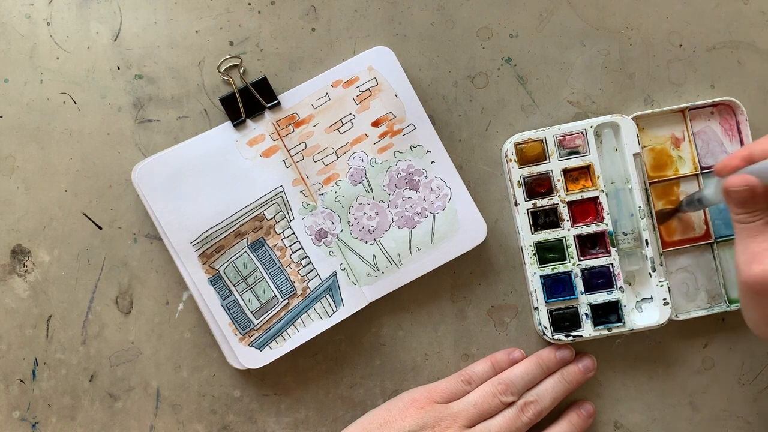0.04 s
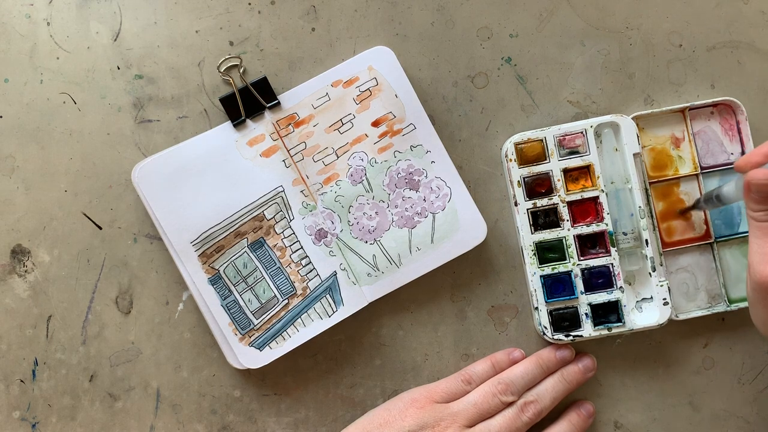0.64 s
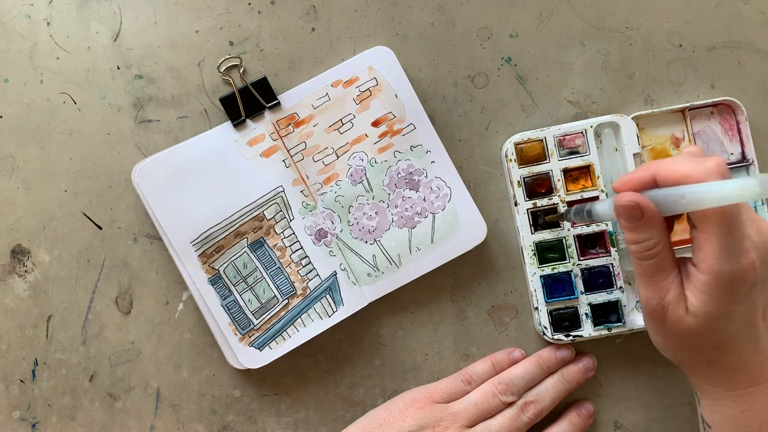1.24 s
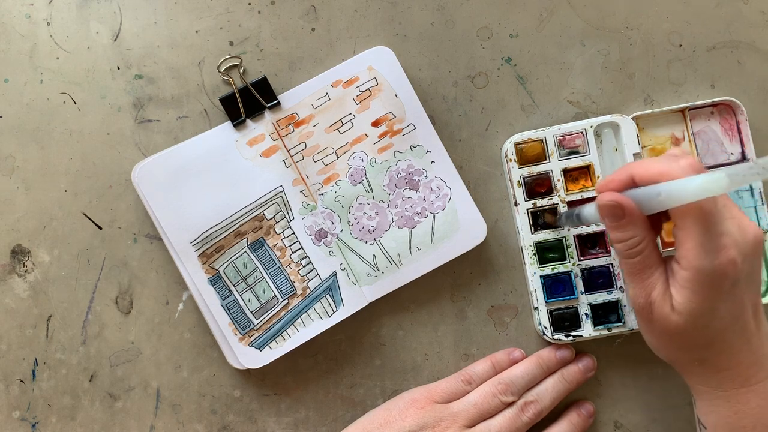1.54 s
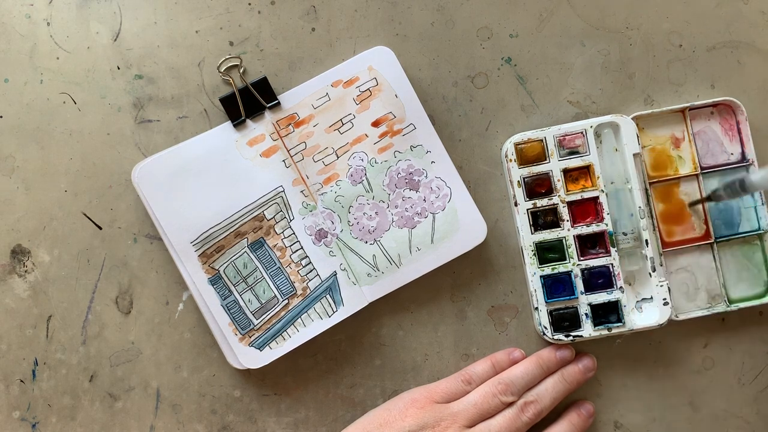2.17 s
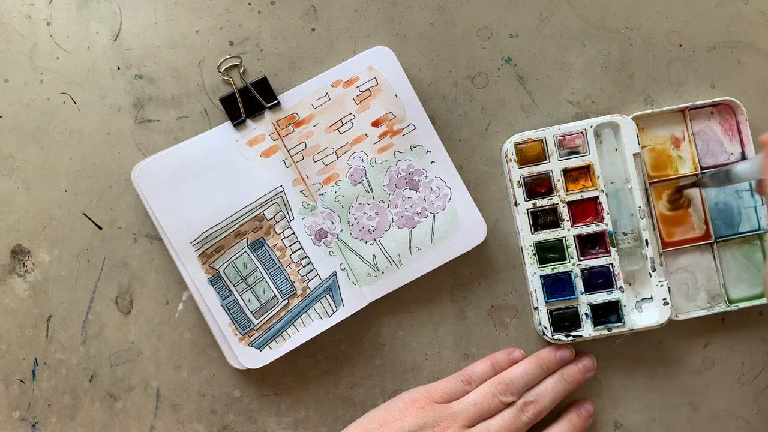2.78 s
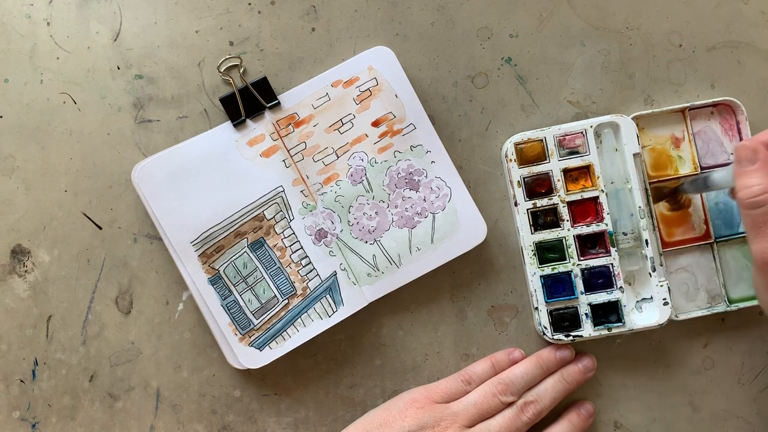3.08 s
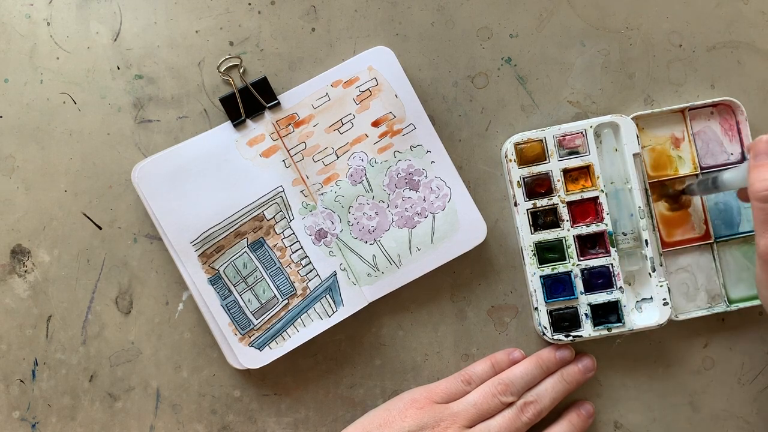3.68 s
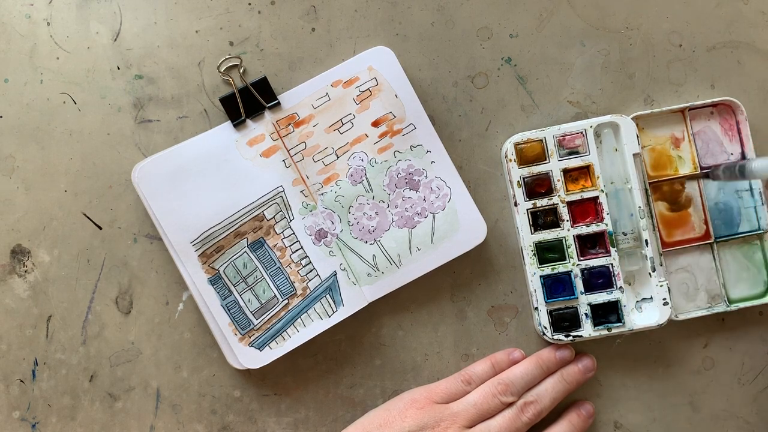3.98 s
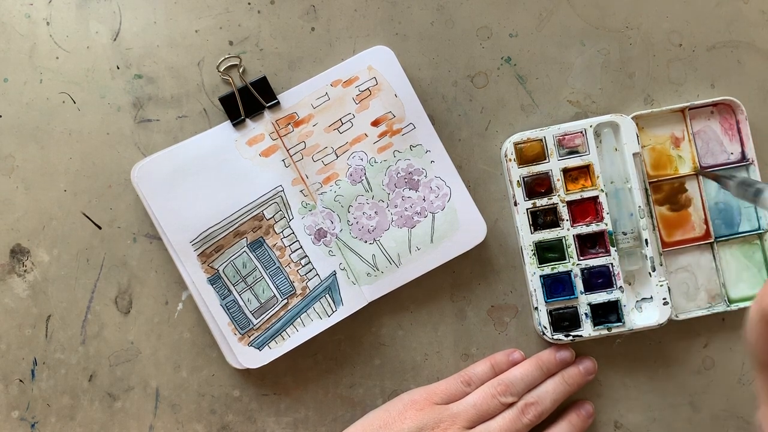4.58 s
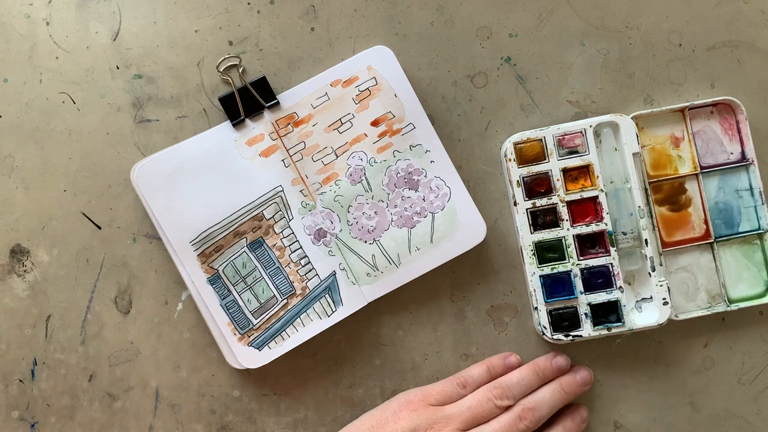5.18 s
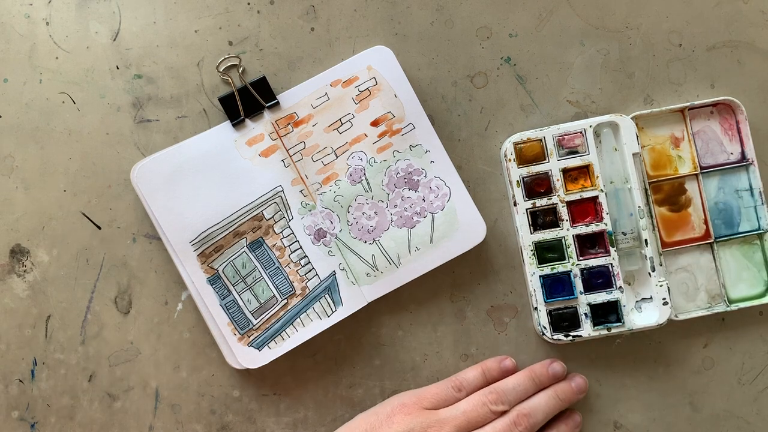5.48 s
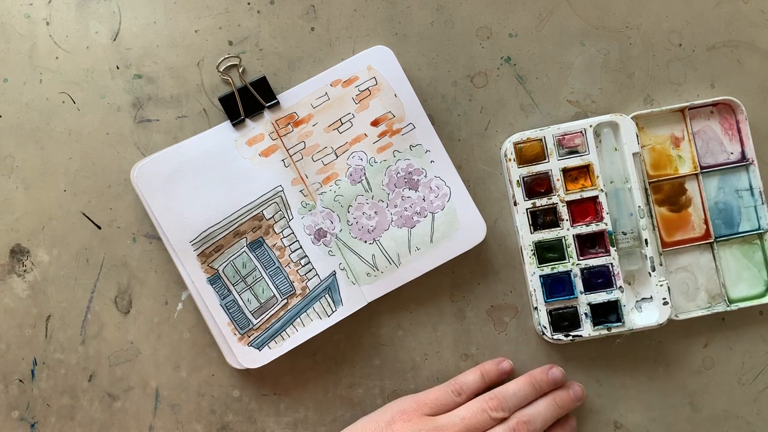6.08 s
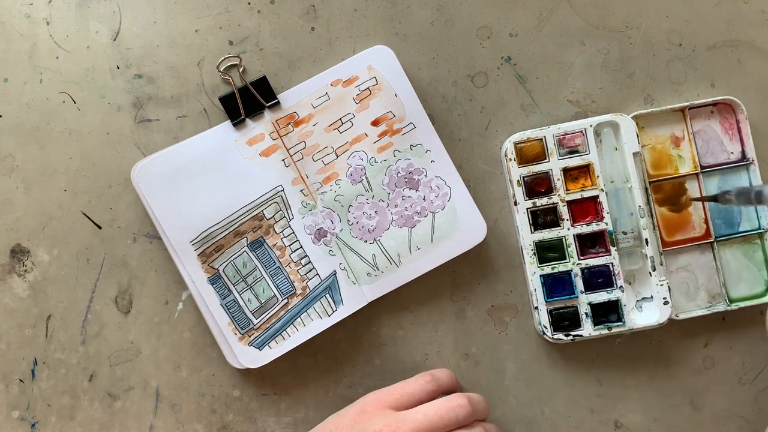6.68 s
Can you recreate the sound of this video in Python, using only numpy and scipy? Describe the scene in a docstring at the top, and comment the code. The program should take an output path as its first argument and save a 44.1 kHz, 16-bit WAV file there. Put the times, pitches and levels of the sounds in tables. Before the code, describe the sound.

Quiet brush dabs in a paint tray, a plastic clack with a soft table thump, then fingers rustling, with a steady low hum behind.

```python
"""A paint palette on a table in a small room, close to a stereo microphone; two motors hum behind it.
First a water brush swirls, dabs and scrubs, its wet bristles catching on the plastic, and the tray
ticks under it, hardest at 3.5 s. Near 4.7 s the brush is knocked down and the table thumps. Then a
hand slides about, fingers handle things with small clicks and rustles, and the brush is picked up again."""
import sys
import numpy as np
from scipy import signal
from scipy.fft import rfft, irfft, next_fast_len
from scipy.io import wavfile
from scipy.ndimage import map_coordinates

SR = 44100
rng = np.random.default_rng(int(sys.argv[2]) if len(sys.argv) > 2 else 0)


def materialize(psi):
    """Save the field psi as 16-bit PCM at rate SR to the path in sys.argv[1].

    A 1-D psi becomes a single channel; in a 2-D psi each row is a channel.
    """
    bounded = np.clip(np.atleast_2d(psi).T, -1, 1)
    quanta = np.round(bounded * 32767).astype(np.int16)
    wavfile.write(sys.argv[1], SR, quanta)


N = 301203

# quick scrubs over a cake of paint: middle t/s, level/dB, rasp f/Hz
CAKE_SCRUBS = [(1.37, -72.5, 2620), (1.598, -64.5, 2737), (1.71, -67.5, 1990), (1.774, -64.5, 2040),
               (1.878, -67.5, 3560), (1.918, -67, 3700), (2.021, -74, 2460), (2.109, -76, 2210),
               (2.208, -72, 2060), (4.031, -72.5, 2360)]
# stirs through a puddle: middle t/s, length/s, squelch level/dB, squelch f/Hz, hiss level/dB
PUDDLE_STIRS = [(2.307, 0.023, -61.5, 2800, -68), (2.338, 0.024, -67.5, 2870, -68.5),
                (2.507, .025, -65, 2710, -67.5), (2.683, 0.019, -69.5, 2600, -75),
                (2.769, 0.01, -69, 3220, -74), (2.87, 0.014, -71.5, 2670, -77),
                (2.905, 0.013, -89, 2700, -82), (3.07, 0.018, -75.5, 2700, -78),
                (3.134, 0.028, -82.5, 2600, -79), (3.305, 0.018, -87, 2690, -78.5),
                (3.391, 0.029, -89, 2690, -83)]
# slow, light swirls through wet paint: middle t/s, length/s, level/dB
PAINT_SWIRLS = [(0.226, 0.41, -78), (0.9, 0.1, -80.5)]
# light wipes of the wet tip across a well: middle t/s, length/s, level/dB
TIP_WIPES = [(0.018, 0.028, -83), (0.084, 0.018, -78), (.41, 0.013, -79), (.52, 0.059, -84),
             (.72, 0.033, -84), (0.912, .025, -83), (1.31, .012, -84), (1.467, 0.0099, -83),
             (2.272, 0.037, -79), (2.545, 0.037, -83), (2.708, .04, -84), (3.056, 0.033, -83),
             (3.489, .04, -86), (3.687, .04, -90)]
# colour of a wipe: f/Hz, level/dB
WIPE_COLOUR = [(1500, -23), (5500, -2), (8000, -4.5), (12000, -2), (15000, -1)]
# resonances of a mixing well: f/Hz, width/Hz, level/dB
WELL_MODES = [(1210, 29, 11.5), (2120, 1200, -8.5), (3500, 1100, -11)]
# the hollow of a paint pan: f/Hz, width/Hz, lift/dB
PAN_PEAKS = [(1230, 140, 8), (1990, 89, 7), (2460, 120, -1), (3720, 170, 2), (4400, 200, 7)]
# hiss of the bristles: f/Hz, level/dB
BRISTLE_COLOUR = [(1500, 14), (4000, 5.5), (6300, 7), (8000, 4.5), (11000, 8), (15000, -1.5)]
# resonances in that hiss: f/Hz, width/Hz, lift/dB
BRISTLE_PEAKS = [(6300, 340, 5.5), (7600, 350, 1.5), (8700, 440, 4)]
# wet bristles part: t/s, level/dB, f/Hz
BRISTLE_TICKS = [(1.504, -69, 7000), (1.524, -62.5, 7400), (1.598, -69, 7640), (1.772, -67.5, 7760),
                 (1.8555, -56.5, 8250), (1.919, -69.5, 8250), (2.295, -65, 6360), (2.508, -62, 7600),
                 (2.761, -69, 7900), (3.061, -70, 8300)]
# rustle of brush and fingers: f/Hz, level/dB
RUSTLE_COLOUR = [(600, 3.5), (1300, 8), (2500, 8), (4200, 2), (5500, -16), (9000, -29), (14000, -22)]

# the palette rocks and ticks: t/s, level/dB
TRAY_TAPS = [(1.806, -50.5), (1.824, -64), (1.865, -47.5), (2.015, -59), (2.099, -56.5), (2.117, -60),
             (3.5429, -33), (5.3003, -47), (5.3322, -61)]
# ring of the plastic tray: f/Hz, level/dB, t60/s
TRAY_MODES = [(1082, -4.5, 0.028), (1237, 2.5, 0.021), (1304, 4, 0.018), (1770, -2, 0.012),
              (1837, 1.5, 0.013), (1956, -0.5, 0.013), (2080, -15, .035), (2207, -13, 0.067),
              (2950, -18, 0.021), (4030, -24, .018), (4850, -23, 0.02)]
# snap of a tap: f/Hz, level/dB
SNAP_COLOUR = [(600, 6), (1300, 13), (2500, 3), (4800, 0), (5600, -24), (9000, -40)]
# hard clicks of the brush's barrel: t/s, level/dB, tilt/(dB per octave)
BARREL_CLICKS = [(1.857, -53, 10), (4.7182, -35, 0.5), (4.7215, -43.5, 0.5), (4.7275, -55, -2),
                 (4.738, -52, 1), (4.748, -54, -14), (4.774, -56, -3), (5.176, -53, -5),
                 (5.3004, -47, -3.5), (5.332, -50, -4), (5.476, -55.5, -5.5), (5.611, -57, -5),
                 (5.622, -51.5, -6), (5.738, -57, -1.5), (5.799, -58, -6.5), (5.811, -53.5, -5.5),
                 (6.003, -62.5, -4), (6.2041, -46, -2), (6.2065, -46.5, -3)]
# crack of a click: f/Hz, level/dB
CRACK_COLOUR = [(200, -13), (530, 8), (900, 1.5), (1400, 3), (2500, -4.5), (3300, 1.5), (4500, 1),
                (5300, -3), (6900, -5), (9300, -3), (15000, -5)]
# ring of the barrel: f/Hz, level/dB, t60/s
TUBE_MODES = [(527, 3.5, 0.026), (920, -4, 0.023), (1547, 3, 0.025), (2048, -4.5, 0.036),
              (3110, -5.5, 0.042), (3396, -2, 0.03), (3640, -8, .03), (3970, -9, 0.02), (4180, -8, .025),
              (4460, -4, 0.033), (4800, -7, 0.034), (6500, -9, 0.022), (8100, -5.5, 0.025),
              (9500, 8, 0.016), (12300, 0, 0.017)]
# the hand lands on the table: t/s, level/dB, rise/s
TABLE_THUMPS = [(4.7256, -30, 0.0051), (4.7541, -33, 0.0064)]
# ring of the table top: f/Hz, level/dB, t60/s
TABLE_MODES = [(104.5, -8, 0.15), (153, 4.5, 0.045), (210, 1.5, 0.036), (295, -19, 0.03), (480, -8, 0.036),
               (570, -10, 0.033)]

# skin and sleeve sweep the table: fastest t/s, rise/s, level/dB, share of SKIN_PEAKS (0 to 1),
# tilt/(dB per octave), lower singing f/Hz, upper singing f/Hz
HAND_SWEEPS = [(4.42, 0.05, -77.5, .7, 0, 4400, 6750), (4.675, 0.074, -64, 0.5, -0.42, 3260, 7730),
               (4.839, 0.033, -71, 1, -0.78, 3620, 4400), (5.015, 0.065, -67, .3, 0.86, 4000, 6900),
               (5.27, 0.062, -75.5, 0.4, 0, 4647, 7500), (6.228, 0.062, -61, 0.4, 0.57, 2580, 7310),
               (6.385, 0.026, -70, .5, -0.87, 4500, 7000), (6.54, 0.027, -76, .8, 1.4, 6296, 8340),
               (6.699, 0.054, -74, 1, 1.6, 4026, 6980)]
# hiss of sliding skin: f/Hz, level/dB
SKIN_COLOUR = [(300, -10), (1000, 9.5), (2000, 1.5), (4000, 0), (5300, -0.5), (6600, 0), (7900, -2.5),
               (9000, -3), (12500, -4), (15500, -5)]
# resonances common to all sweeps: f/Hz, width/Hz, lift/dB
SKIN_PEAKS = [(3430, 40, 7), (3620, 45, 13), (4250, 60, 10), (5290, 45, 7), (5790, 70, 8), (6240, 45, 7),
              (6480, 55, 8), (6720, 60, 11), (7220, 55, 12), (8050, 50, 6), (8530, 55, 8)]
# fingers rub and scrape: middle t/s, length/s, level/dB, scrape f/Hz
FINGER_RUBS = [(4.374, 0.028, -72.5, 1340), (4.659, 0.065, -80, 1190), (5.108, 0.05, -76.5, 4040),
               (5.257, 0.043, -77.5, 2900), (5.297, .01, -66, 2850), (5.458, .03, -78, 4300),
               (5.509, 0.035, -66, 1640), (5.614, 0.05, -80, 4500), (5.849, 0.02, -72, 3900),
               (6.002, .06, -75.5, 2370), (6.161, 0.06, -68.5, 2850), (6.278, .03, -74, 1100),
               (6.39, 0.046, -72, 1100)]
# dull part of a rub: f/Hz, level/dB
RUB_COLOUR = [(200, -38), (500, 2), (900, 1.5), (1300, -0.5), (2200, -54), (5000, -57)]
# resonances of the things handled: f/Hz, width/Hz, lift/dB
HANDLED_PEAKS = [(1210, 70, 0), (1600, 70, 7), (2125, 72, 8.5), (2470, 85, 4.5), (2750, 80, 9),
                 (3230, 70, 6), (4030, 97, 4.5), (4360, 150, 10)]
# dry slips of the fingers: t/s, level/dB, f/Hz
FINGER_CRACKLES = [(5.499, -68, 2150), (5.582, -63, 3700), (5.8347, -51, 3900), (5.931, -62, 3100),
                   (5.97, -65, 2040), (5.987, -60.5, 3100), (6.003, -68, 2880), (6.022, -68, 2500),
                   (6.043, -60.5, 2280), (6.1182, -62, 2500), (6.138, -69, 2490), (6.1646, -55, 1620)]
# soft knocks of fingers and pans: t/s, level/dB, f/Hz
SOFT_KNOCKS = [(1.106, -56, 520), (4.023, -55, 850), (4.089, -57, 560), (4.78, -52, 1074),
               (4.791, -53.5, 1155), (4.805, -57, 1117), (6.357, -47.5, 860), (6.418, -53.5, 1104)]
# hollow ring of a knock: multiple of its pitch, level/dB, t60/s
HOLLOW_MODES = [(1, 2, 0.034), (.8, -3, .03), (1.16, -11, 0.023)]

# the upper motor's hum ebbs and returns: t/s, level/dB
HUM_LEVEL = [(0, -51), (.8, -52), (3.0, -59), (4.9, -50), (6.1, -47), (6.83, -49.5)]
# course of the room's rumble: t/s, level/dB
RUMBLE_COURSE = [(0, -52), (.9, -51.5), (1.4, -53), (2.1, -52), (3.45, -54), (3.69, -49.5), (3.85, -53.5),
                 (4.6, -52.5), (5.3, -54.5), (6.1, -53), (6.83, -54)]
# colour of the rumble: f/Hz, level/dB
RUMBLE_COLOUR = [(20, -3.5), (32, 1), (65, -7), (120, 1.5), (200, -4), (290, -17.5), (500, -58.5)]
# thin rush of the room's air: f/Hz, level/dB
AIR_COLOUR = [(120, -12.5), (250, 2.5), (350, 1), (440, -3.5), (560, -3), (700, -7), (850, -7.5),
              (1000, -11.5), (1250, -12.5), (2000, -24), (3000, -26.5), (6000, -38), (9000, -35),
              (15000, -42)]
# decay of the small room: f/Hz, t60/s
ROOM_DECAY = [(150, 0.1), (2000, 0.2), (12000, 0.022)]
# room tone at the microphone: f/Hz, left-right likeness (-1 to 1)
FAR_LIKENESS = [(120, 0.98), (260, 0.82), (600, 0.3), (1200, 0.47), (2000, -0.099), (3000, -0.36),
                (5500, 0.31), (7400, 0.68), (12000, 1), (14000, .9)]
# close sounds at the microphone: f/Hz, left-right likeness (-1 to 1)
NEAR_LIKENESS = [(200, 0.76), (1200, 0.35), (3000, 0.1), (5500, 0.26), (7400, 1), (13000, 1)]
# phase between the microphone ports: f/Hz, lead of left/rad
MIC_PHASE = [(4500, 0), (5700, 2.6), (6500, 1.1), (7500, 0), (9000, -1.7), (10000, -3), (10900, -3.25),
             (13200, -6.28), (14300, -6.28), (15700, -8.4)]
# balance of the ports: f/Hz, level of left over right/dB
MIC_BALANCE = [(120, -0.5), (400, 0), (800, 5), (1400, 2.5), (3500, 2), (6200, -3), (7500, 0)]

SIDE = np.array([[.5], [-.5]])  # splits a difference between left and right


def brush():
    """Close up, wet bristles catch on plastic: wells ring, hairs hiss, paint rasps, a puddle squelches."""
    track = np.zeros((2, N))
    scrub_s, rasp_width_hz, rasp_lift_db = .021, 260, 9.5
    well = lambda length: stroke(length, lambda hz: resonances(WELL_MODES, hz), grain_db=0)
    hiss = lambda length: stroke(length, lifted(BRISTLE_COLOUR, BRISTLE_PEAKS), grain_db=1)

    def rasp(length, hz):
        """A paint pan's hollow, with a wet resonance for this stroke alone."""
        peaks = PAN_PEAKS + [(hz, rasp_width_hz, rasp_lift_db)]
        return stroke(length, lifted(RUSTLE_COLOUR, peaks), grain_db=3)

    for s, db, rasp_hz in CAKE_SCRUBS:
        scrub = well(scrub_s) + rasp(scrub_s, rasp_hz) + amp(-13) * hiss(scrub_s)
        add(track, s - 2 * scrub_s, amp(db - 2.5) * scrub)
    for s, length, db, squelch_hz, hiss_db in PUDDLE_STIRS:
        puddle = [(squelch_hz, 0.14 * squelch_hz, 0)]
        # the resonance acts twice, which gives it steep sides
        squelch = stroke(length, lambda hz: resonances(puddle, hz) ** 2, grain_db=1)
        wet = squelch + amp(-8) * rasp(length, squelch_hz) + amp(-4.5) * well(length)
        add(track, s - 2 * length, amp(db) * wet + amp(hiss_db) * hiss(length))
    for s, length, db in PAINT_SWIRLS:
        swirl = stroke(length, colour(RUSTLE_COLOUR), grain_db=3.5) + amp(-10.5) * hiss(length)
        add(track, s - 2 * length, amp(db) * swirl)
    for s, length, db in TIP_WIPES:
        wipe = stroke(length, lifted(WIPE_COLOUR, BRISTLE_PEAKS), grain_db=2)
        add(track, s - 2 * length, amp(db) * wipe)
    return in_room(track, wet_db=-13.5)


def wet_ticks():
    """Films of paint snap between the bristles, each with a short, high ring."""
    track, t = np.zeros((2, N)), np.arange(SR // 16) / SR
    t60_s, width_hz = 0.026, 970
    for s, db, hz in BRISTLE_TICKS:
        response = lifted(BRISTLE_COLOUR, [(hz, width_hz, 16)])
        snap = stereo(rng.standard_normal((2, len(t))), response, NEAR_LIKENESS)
        add(track, s, snap * amp(db - 60 * t / t60_s) * attack(t, rise_s=0.00098))
    return in_room(track, wet_db=-5.5)


def palette():
    """Taps ring the tray, just right of centre; weak ones rise slowly and stir only its main modes."""
    track, t = np.zeros((2, N)), np.arange(SR // 5) / SR
    snap_db, snap_t60_s = -19.5, 0.022
    hardest_db = max(db for s, db in TRAY_TAPS)
    for s, db in TRAY_TAPS:
        softness = 0.84 * (hardest_db - db)
        modes = [(hz, level - 2.9 * softness * abs(np.log2(hz / 1250)), t60)
                 for hz, level, t60 in TRAY_MODES]
        body = ring(modes, t) * attack(t, rise_s=0.0012 * 2 ** (softness / 2.6))
        noise = unit(filtered(rng.standard_normal(len(t)), colour(SNAP_COLOUR)))
        snap = amp(snap_db - softness - 60 * t / snap_t60_s) * noise
        add(track, s, amp(db + 0.5) * (body / abs(body).max() + snap))
    # so small a tray radiates little bass
    track = signal.sosfilt(signal.butter(4, 900, "highpass", fs=SR, output="sos"), track)
    return in_room(placed(track, left_db=-1.5, lead_s=-0.000093), wet_db=-11)


def barrel():
    """The brush's plastic barrel cracks and rings on contact; light clicks rise slower and ring less."""
    track, t = np.zeros((2, N)), np.arange(SR // 8) / SR
    crack_t60_s, ring_halves_db, rise_doubles_db = 0.031, 23, 19
    hardest_db = max(db for s, db, tilt_db in BARREL_CLICKS)
    for s, db, tilt_db in BARREL_CLICKS:
        tilt = lambda hz: tilt_db * np.log2(np.maximum(hz, 1000) / 1000)
        response = lambda hz: amp(along(CRACK_COLOUR, hz) + tilt(hz))
        noise = stereo(rng.standard_normal((2, len(t))), response, NEAR_LIKENESS)
        crack = noise * amp(-60 * t / crack_t60_s)
        modes = [(hz, level + tilt(hz), t60) for hz, level, t60 in TUBE_MODES]
        tube_rms = np.sqrt(sum(amp(level) ** 2 for hz, level, t60 in modes) / 2)
        tube = np.array([ring(modes, t), ring(modes, t)]) / tube_rms
        ring_share = 0.66 * .5 ** ((hardest_db - db) / ring_halves_db)
        click = ring_share * tube + np.sqrt(1 - ring_share ** 2) * crack
        rise_s = 0.00072 * 2 ** ((hardest_db - db) / rise_doubles_db)
        add(track, s, amp(db) * click * attack(t, rise_s))
    return in_room(track, wet_db=-8.5)


def table():
    """The hand lands softly and stirs the low modes of the table top."""
    track, t = np.zeros((2, N)), np.arange(SR // 3) / SR
    for s, db, rise_s in TABLE_THUMPS:
        add(track, s, -amp(db) * ring(TABLE_MODES, t) * attack(t, rise_s))
    return in_room(track, wet_db=-16)


def hand():
    """Skin and sleeve sweep the table, singing in narrow resonances; fingers scrape and rub."""
    track, t = np.zeros((2, N)), np.arange(SR) / SR - .5
    scratch_db, drag_db, fall_over_rise = 3, 1.4, 1.78
    sing_width_hz, sing_db, weak_width_hz, weak_db = 80, 9, 55, 7
    for s, rise_s, db, ringing, tilt_db, low_hz, high_hz in HAND_SWEEPS:
        shared = [(hz, width, ringing * lift) for hz, width, lift in SKIN_PEAKS]
        singing = [(hz, sing_width_hz, sing_db) for hz in (low_hz, high_hz)]
        weak_hz = np.linspace(1800, 9000, num=14) + rng.uniform(-250, 250, size=14)
        weak = [(hz, weak_width_hz, weak_db) for hz in weak_hz]
        skin = [(hz, level + tilt_db * np.log2(hz / 1000)) for hz, level in SKIN_COLOUR]
        # a sweep gathers speed quickly and runs out more slowly
        speed = np.exp(-np.maximum(-t / rise_s, t / (fall_over_rise * rise_s)) ** 1.54)
        drag = amp(db + drag_db * wobble(34.7, len(t)))
        hiss = friction(lifted(skin, shared + singing + weak), scratch_db, slips_per_s=600, size=len(t))
        add(track, s + t[0], drag * speed * hiss)
    for s, length, db, scrape_hz in FINGER_RUBS:
        peak = [(scrape_hz, 0.19 * scrape_hz, 8)]
        scrape = stroke(length, lifted(RUSTLE_COLOUR, HANDLED_PEAKS + peak), scratch_db, slips_per_s=220)
        rub_db = 9.5 * np.log2(2290 / scrape_hz)  # low scrapes carry more dull rub
        rub = amp(rub_db) * stroke(length, lifted(RUB_COLOUR, peak), grain_db=1)
        add(track, s - 2 * length, amp(db) * (scrape + rub))
    return in_room(track, wet_db=-14.5)


def crackles():
    """Each slip of the fingers is a quick, dry burst with one broad resonance of its own."""
    track, t = np.zeros((2, N)), np.arange(SR // 12) / SR
    t60_s, width_hz = 0.029, 280
    for s, db, hz in FINGER_CRACKLES:
        response = lifted(RUSTLE_COLOUR, HANDLED_PEAKS + [(hz, width_hz, 11)])
        burst = friction(response, grain_db=1.5, slips_per_s=640, size=len(t))
        add(track, s, burst * amp(db - 60 * t / t60_s) * attack(t, rise_s=0.00065))
    return in_room(track, wet_db=-8)


def knocks():
    """Soft contacts of fingers and pans stir a hollow, quickly damped ring."""
    track, t = np.zeros((2, N)), np.arange(SR // 8) / SR
    for s, db, hz in SOFT_KNOCKS:
        modes = [(multiple * hz, level, t60) for multiple, level, t60 in HOLLOW_MODES]
        add(track, s, amp(db) * ring(modes, t) * attack(t, rise_s=0.0014))
    return in_room(track, wet_db=-7)


def motors():
    """In the background, two slightly unsteady motors beat against each other."""
    t = np.arange(N) / SR
    low_hz, high_hz = 150.3, 176.6
    high_db = over_time(HUM_LEVEL)
    low_db = -55 + 0.33 * (high_db - high_db.mean())  # follows a third of the ebb
    low_phase = 2 * np.pi * low_hz * t + .45 * wobble(3.7)
    high_phase = 2 * np.pi * high_hz * t + .16 * wobble(4)
    low = amp(low_db + 2 * wobble(5.1)) * np.sin(low_phase)
    high = amp(high_db + 0.89 * wobble(3.3)) * np.sin(high_phase)
    overtone = amp(-70.5 + 3.2 * wobble(3.25)) * np.sin(2 * high_phase + wobble(14))
    return low + high + overtone


def rumble():
    """The low end of the room tone, gently rising and falling."""
    gain = amp(over_time(RUMBLE_COURSE) + 0.54 * wobble(9.7))
    return gain * stereo(rng.standard_normal((2, N)), colour(RUMBLE_COLOUR), FAR_LIKENESS)


def air():
    """The room's thin, nearly even rush."""
    gain = amp(-61.5 + .5 * wobble(11))
    return gain * stereo(rng.standard_normal((2, N)), colour(AIR_COLOUR), FAR_LIKENESS)


def in_room(x, wet_db):
    """The direct sound plus the room's short answer, 4 ms later and unrelated on each side."""
    hz, t, noise = signal.stft(rng.standard_normal((2, SR // 2)), SR, nperseg=256)
    decay = amp(-60 * t / along(ROOM_DECAY, hz)[:, None])
    tail = signal.istft(noise * decay, SR, nperseg=256)[1]
    tail = np.pad(tail / np.linalg.norm(tail[0]), ((0, 0), (SR // 250, 0)))
    return x + amp(wet_db) * signal.fftconvolve(x, tail, axes=1)[:, :N]


def reflections(x, echo_db, count):
    """Weak copies from the table and nearby walls ripple the middle and treble."""
    echoes = np.zeros(SR // 40)
    echoes[rng.integers(SR // 500, len(echoes), count)] = amp(echo_db) * rng.choice([-1, 1], count)
    copies = signal.fftconvolve(x, echoes[None], axes=1)[:, :N]
    return x + filtered(copies, colour([(200, -19), (500, -3.5), (1200, -4), (9000, 1.5), (14000, -1.5)]))


def placed(x, left_db, lead_s):
    """A source to one side of the microphone is louder there and arrives earlier."""
    return filtered(x, lambda hz: amp(SIDE * left_db) * np.exp(2j * np.pi * hz * SIDE * lead_s))


def stroke(length, response, grain_db, slips_per_s=700):
    """Friction under a bell-shaped pressure that peaks after twice the length."""
    t = np.arange(int(4 * length * SR)) / SR
    pressure = np.exp(-2 * (t / length - 2) ** 2)
    return pressure * friction(response, grain_db, slips_per_s, size=len(t))


def friction(response, grain_db, slips_per_s, size):
    """Countless tiny slips of uneven strength, heard through a body."""
    slips = rng.standard_normal((2, size)) * amp(grain_db * wobble(slips_per_s, size))
    return stereo(slips, response, NEAR_LIKENESS)


def ring(modes, t):
    """Damped modes (f/Hz, level/dB, t60/s), struck at slightly new strengths."""
    return sum(amp(db + rng.standard_normal() - 60 * t / t60) * np.sin(2 * np.pi * hz * t)
               for hz, db, t60 in modes)


def attack(t, rise_s):
    """The onset of a contact, from 0 towards 1."""
    return 1 - np.exp(-t / rise_s)


def resonances(modes, hz):
    """The response of resonances (f/Hz, width/Hz, level/dB), alternating in sign."""
    return sum((-1) ** k * amp(db) * 1j * hz * width / (centre ** 2 - hz ** 2 + 1j * hz * width)
               for k, (centre, width, db) in enumerate(modes))


def lifted(spectrum, peaks):
    """A broad colour with narrow peaks (f/Hz, width/Hz, lift/dB) standing on it."""
    lift = lambda hz: sum(db / (1 + (2 * (hz - centre) / width) ** 2) for centre, width, db in peaks)
    return lambda hz: amp(along(spectrum, hz) + lift(hz))


def colour(spectrum):
    """The response of (f/Hz, level/dB) points."""
    return lambda hz: amp(along(spectrum, hz))


def stereo(pair, response, likeness):
    """Two unrelated noises become a coloured, partly alike left and right of rms 1."""
    angle = lambda hz: np.arccos(np.clip(along(likeness, hz), -1, 1)) / 2
    mid, side = filtered(pair, lambda hz: response(hz) * np.array([np.cos(angle(hz)), np.sin(angle(hz))]))
    return unit(np.array([mid + side, mid - side]))


def filtered(x, response):
    """x through a frequency response."""
    size = x.shape[-1]
    padded = next_fast_len(size + 8192)
    return irfft(rfft(x, padded) * response(np.fft.rfftfreq(padded, 1 / SR)), padded)[..., :size]


def wobble(rate, size=N):
    """A smooth random curve, rate knots a second."""
    knots = rng.standard_normal(int(size * rate / SR) + 4)
    return map_coordinates(knots, [np.arange(size) * rate / SR])


def along(points, hz):
    """Read (f/Hz, value) points on a log axis."""
    freqs, values = np.transpose(points)
    return np.interp(np.log(hz + 1), np.log(freqs + 1), values)


def over_time(points):
    """One value per sample from (t/s, value) points."""
    return np.interp(np.arange(N) / SR, *np.transpose(points))


def add(track, s, sound):
    """Mix a sound into a track at s seconds."""
    start = round(s * SR)
    sound = sound[..., max(-start, 0):]
    part = track[..., max(start, 0):][..., :sound.shape[-1]]
    part += sound[..., :part.shape[-1]]


def amp(db):
    """Decibels to gain."""
    return 10 ** (np.asarray(db) / 20)


def unit(x):
    """Scale to rms 1."""
    return x / np.sqrt(np.mean(x ** 2) + 1e-20)


def scene():
    """The table top close up, with the room tone behind it."""
    soft = reflections(air() + brush() + hand(), echo_db=-18.5, count=8)
    room_tone = motors() + rumble()
    return room_tone + soft + wet_ticks() + palette() + barrel() + crackles() + knocks() + table()


def record(dry):
    """The two microphone ports differ in level and phase with frequency; nothing passes above top_hz."""
    top_hz = 15750
    ports = lambda hz: amp(SIDE * along(MIC_BALANCE, hz)) * np.exp(1j * SIDE * along(MIC_PHASE, hz))
    return filtered(dry, lambda hz: ports(hz) * (hz < top_hz))


dry = scene()
out = record(dry)
materialize(out)
```